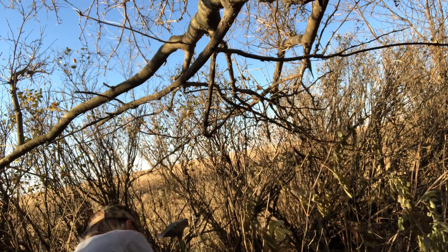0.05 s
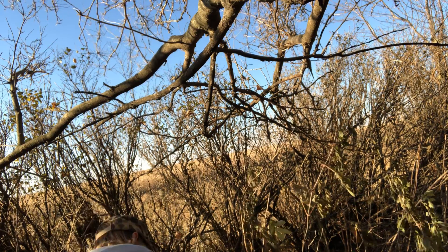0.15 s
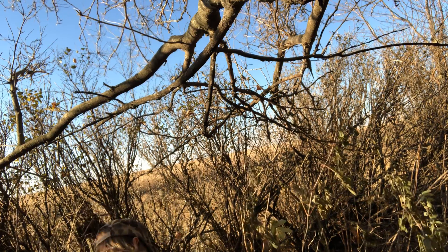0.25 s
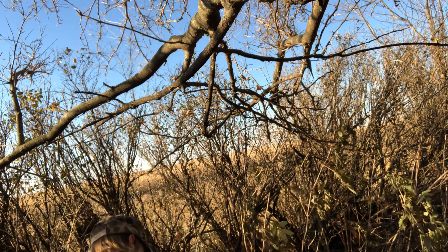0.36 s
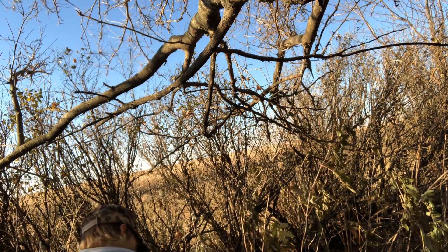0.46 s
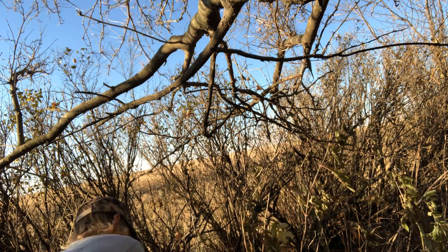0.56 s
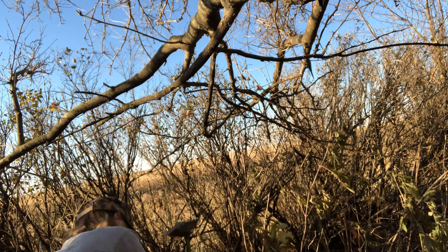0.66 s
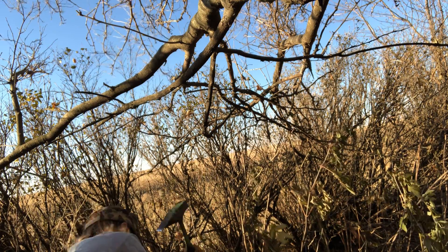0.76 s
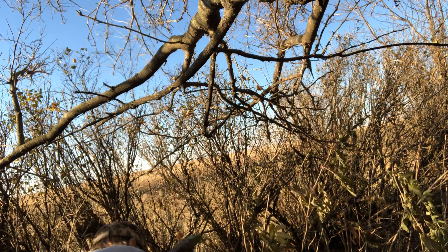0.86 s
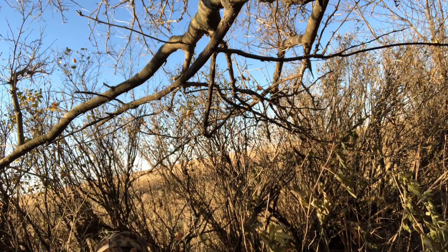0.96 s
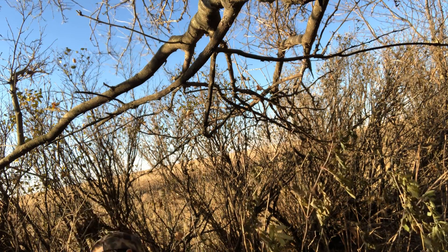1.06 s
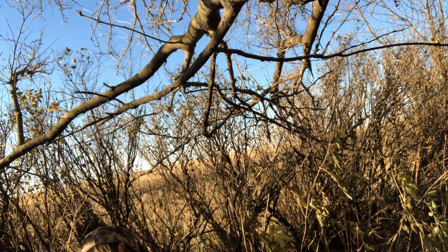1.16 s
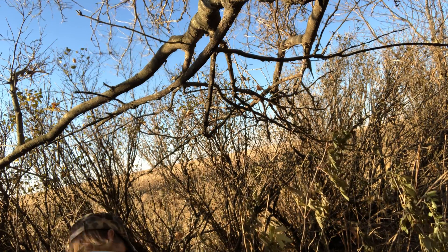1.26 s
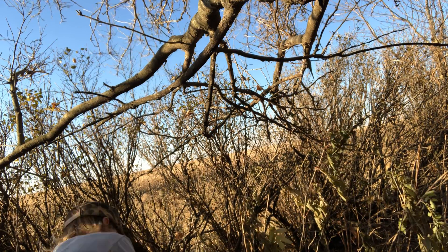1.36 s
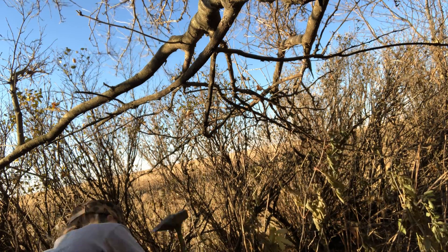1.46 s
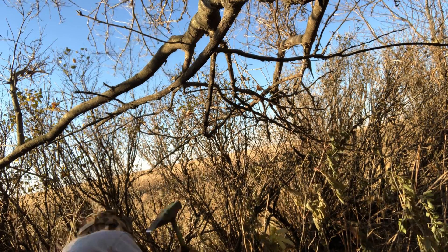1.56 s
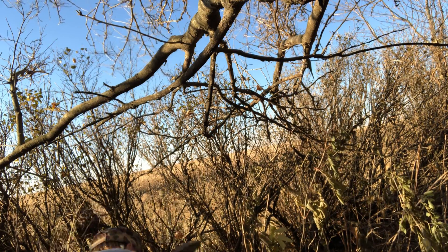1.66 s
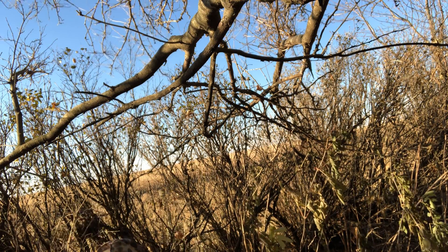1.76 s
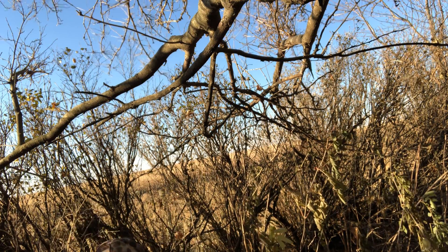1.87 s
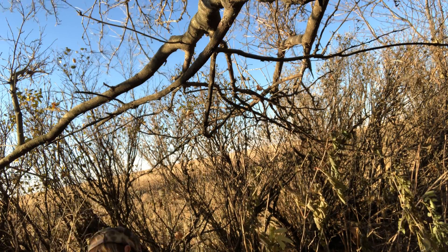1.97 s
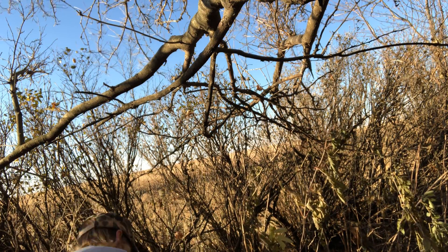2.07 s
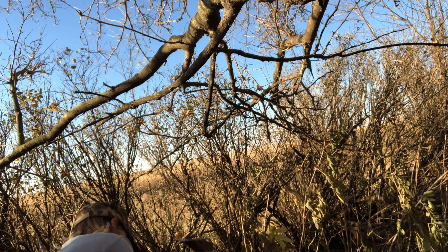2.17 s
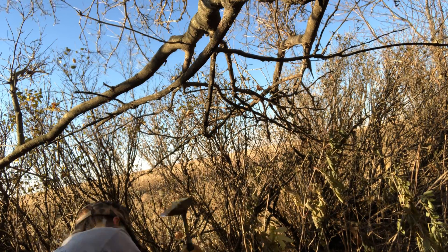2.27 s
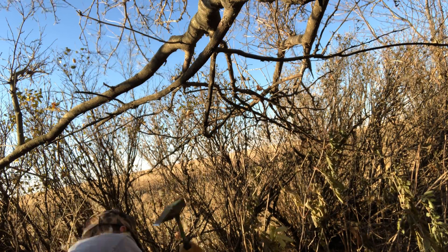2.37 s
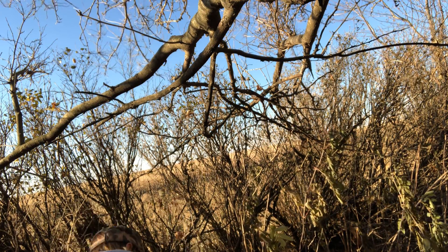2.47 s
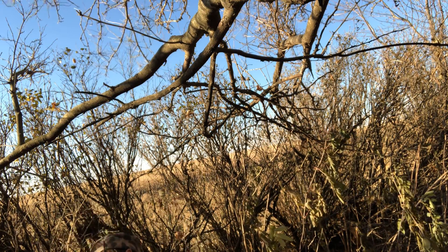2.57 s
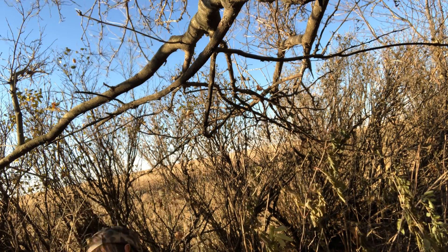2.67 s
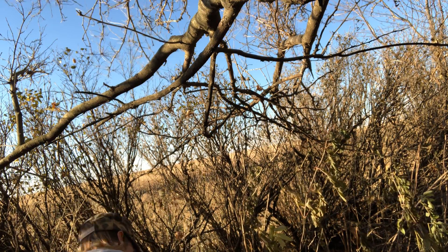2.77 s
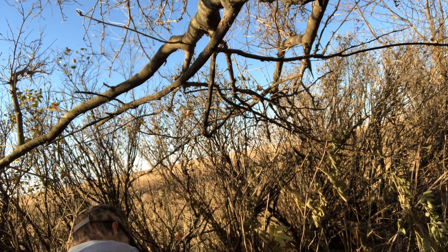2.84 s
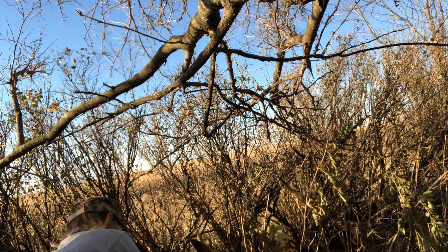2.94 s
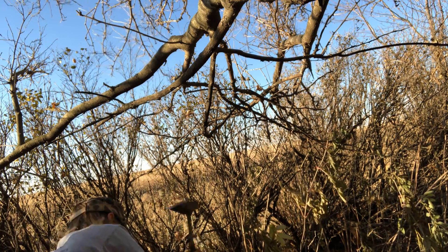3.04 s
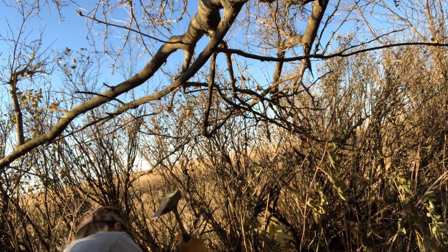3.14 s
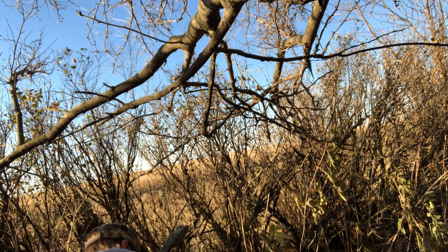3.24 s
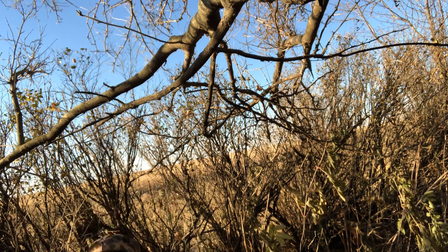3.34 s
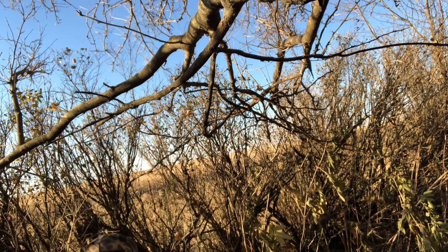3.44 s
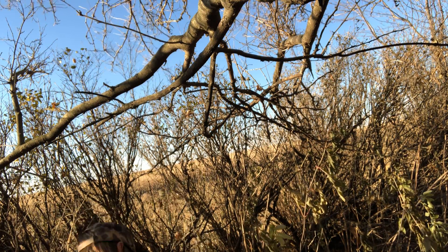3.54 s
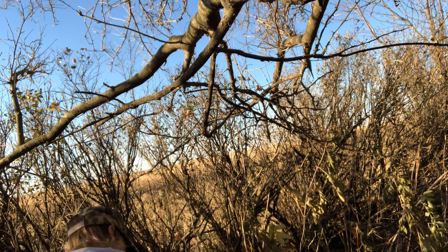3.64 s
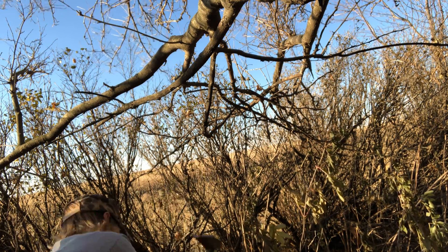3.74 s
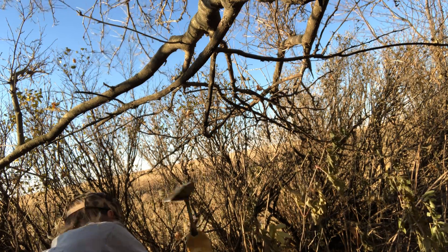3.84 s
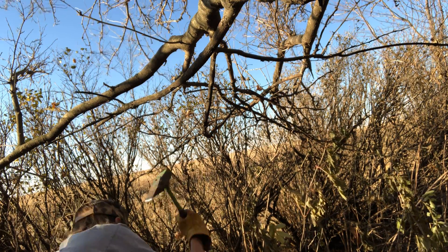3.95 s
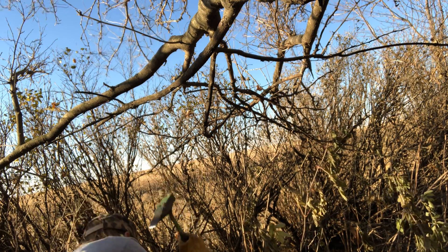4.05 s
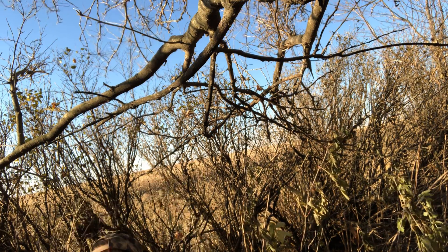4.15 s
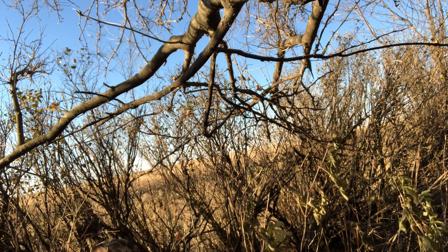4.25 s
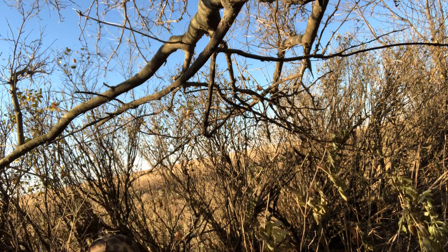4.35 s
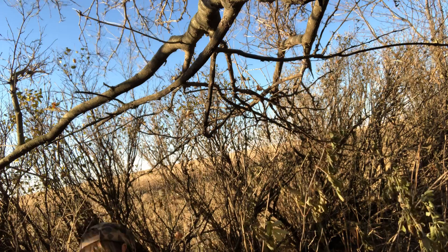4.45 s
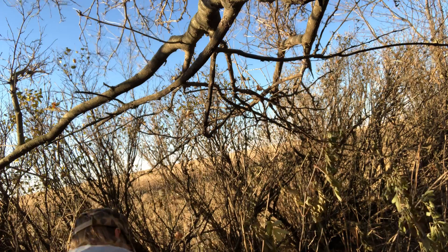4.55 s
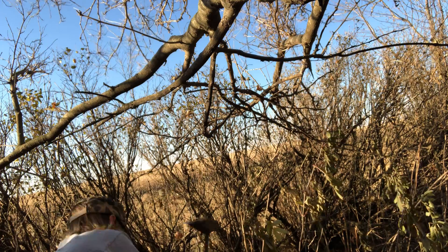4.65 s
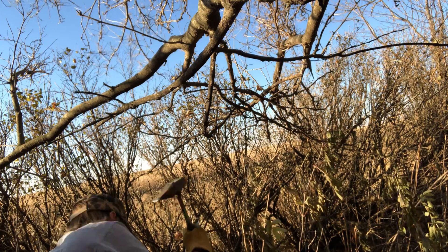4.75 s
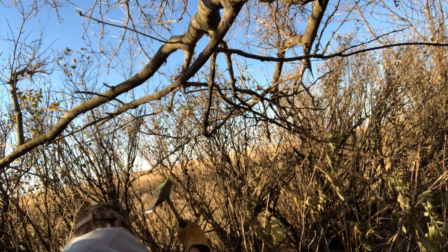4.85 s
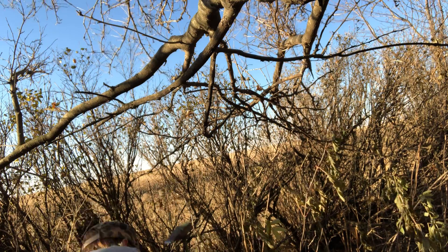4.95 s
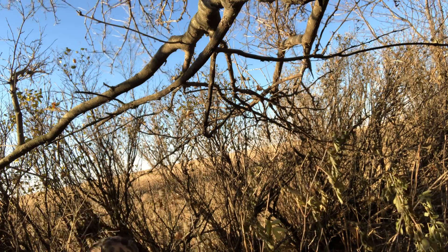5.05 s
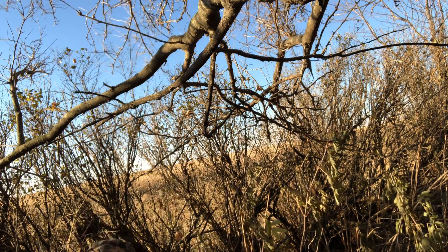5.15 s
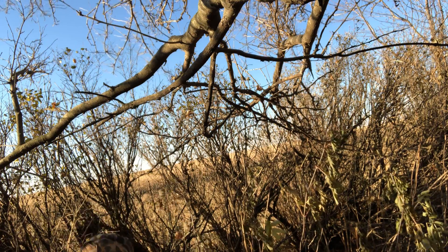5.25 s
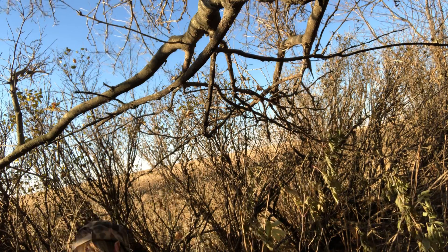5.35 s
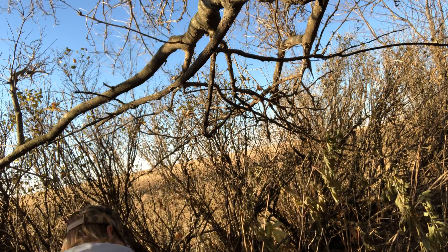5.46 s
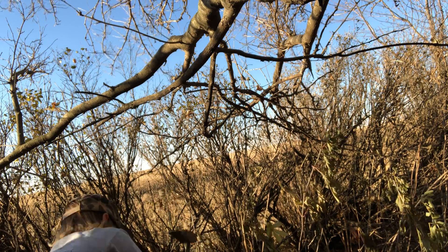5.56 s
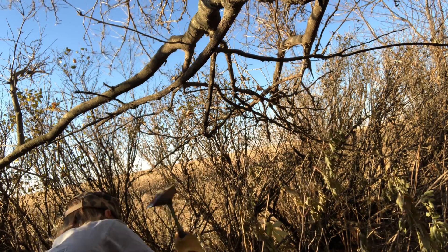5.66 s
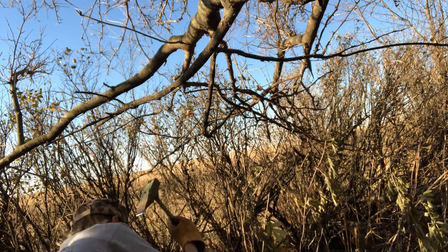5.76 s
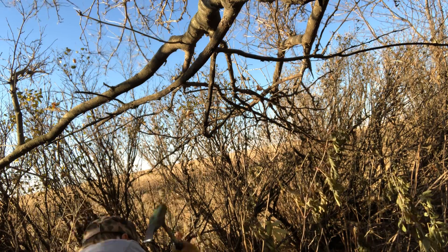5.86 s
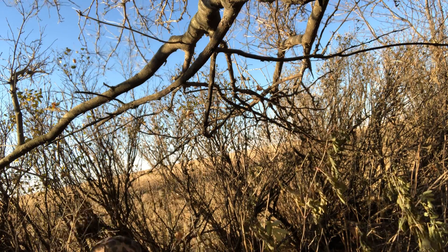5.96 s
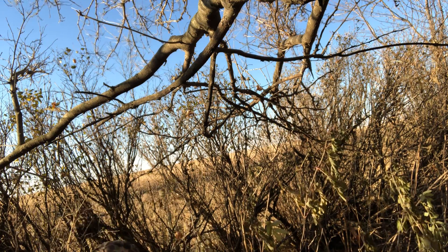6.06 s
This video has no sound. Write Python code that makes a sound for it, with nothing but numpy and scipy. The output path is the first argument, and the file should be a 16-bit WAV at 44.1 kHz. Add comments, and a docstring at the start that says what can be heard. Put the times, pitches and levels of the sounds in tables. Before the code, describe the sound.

After a faint sleeve rub, heavy steel-on-steel blows begin, dry and piercing, their ring quickly choked by soil. The first two are followed by bouncing clinks; cloth rubs and snaps before the third. Later blows sound fuller and knockier. A soft low bump comes before the final blow, then cloth again. Open brushy ground, nearly no echo, a single near microphone, quiet hum and leaf ticks behind.

```python
"""Brushy woods, one microphone behind the hammer: distant air hums and leaves tick throughout.
A sleeve rubs near the start, after the second blow and at the end. Eight hard blows drive a steel trap stake
into soft ground, among light touches and thin tings: each blow is a noise crack, damped sine modes of stake and
head, a falling soil thud and noise scattered in the brush. Late on the hum eases into a lull and a soft low bump
falls between the last two blows. The recorder's limiter ducks on peaks, rounds the rest and cuts the top."""
import sys
import numpy as np
from scipy import signal
from scipy.fft import rfft, irfft, next_fast_len
from scipy.io import wavfile
from scipy.ndimage import uniform_filter1d, minimum_filter1d, map_coordinates

SR = 44100
rng = np.random.default_rng(int(sys.argv[2]) if len(sys.argv) > 2 else 0)


def pcm_store(signal):
    """Save signal as 16-bit PCM."""
    levels = np.round(np.clip(np.atleast_2d(signal), -1, 1) * 32767)
    wavfile.write(sys.argv[1], SR, levels.astype(np.int16).T)


N = 269451  # length in samples
T = np.arange(SR // 2) / SR  # seconds since a contact

# All levels in the tables are relative; each layer sets its own place in the mix.
# Hard blows on the stake. Each row: start in seconds, force in dB, dull knock in dB, low stake ring in dB,
# high stake ring in dB, lingering ring in dB, hammer ring in dB, soil thud in dB,
# thud lag in seconds, thud attack in seconds.
HARD_BLOWS = [(0.2298, 0, -7.5, -3.5, -3, -27, 6.5, -2, 0, .009),
              (0.9635, 0, -2, -4, 0, -27, 7.5, 0, 0.00048, .01),
              (1.7603, 1, -1, -3, 1.5, -26, -17, 0, 0.0035, .008),
              (2.5325, 2.5, -8, -2, 2, -25, 0.5, 0.5, 0.0036, .009),
              (3.3440, 2.5, 4, 0.5, 0, -19, 2.5, 1, 0.0008, .01),
              (4.1830, 1.5, 7.5, 2.5, -0.5, -20, -1, 0, 0.0024, .011),
              (5.0672, 1, 1, 3, 1, -25, 6.5, -1.5, .002, .027), (6.0160, 4, 4, 2, 2, -25, 3, -5, .01, .02)]
# Colour of steel cracking on steel. Each row: frequency in Hz, level in dB.
CRACK_COLOUR = [(150, -31), (500, -28), (1100, 5), (1550, -12.5), (2100, 5.5), (3300, -4.5), (4000, 2.5),
                (4950, 2.5), (5700, -17.5), (6700, -1.5), (8300, -20.5), (13000, -13), (16000, -21)]
# Colour of the dull knock under the crack. Each row: frequency in Hz, level in dB.
KNOCK_COLOUR = [(200, -54), (430, -1), (620, -11.5), (830, -2), (1150, 5.5), (1520, -10.5), (3000, -21),
                (16000, -46)]


def blows():
    """Full swings: crack, its bounce off the ground, a second contact, ringing steel, thud and scatter."""
    out = np.zeros(N)
    for s, force_db, knock_db, low_db, high_db, linger_db, hammer_db, soil_db, lag, attack in HARD_BLOWS:
        crack = amp(force_db + 8.5) * burst(CRACK_COLOUR, fade_s=.015)
        knock = amp(knock_db - 3) * burst(KNOCK_COLOUR, fade_s=.023)
        add(out, s, crack + knock)
        ground_bounce = amp(force_db + .5) * burst(CRACK_COLOUR, fade_s=.022)
        add(out, s + .0034, ground_bounce)
        rebound_s = .013 + .005 * rng.random()  # the stake springs back against the hammer face
        add(out, s + rebound_s, amp(force_db - 18) * burst(CRACK_COLOUR, fade_s=.022))
        add(out, s, amp(-13) * stake_ring(low_db, high_db, linger_db))
        add(out, s, amp(hammer_db - 13.5) * hammer_ring())
        add(out, s, amp(force_db - 16.5) * brush(rise=.0011))
        add(out, s + lag, amp(soil_db) * thud(attack))
    return out


# Modes of the stake. Each row: frequency in Hz, level in dB, 60 dB decay in seconds before the soil's damping.
STAKE_MODES = [(1938, -4, .14), (2025, 0, .12), (2480, -15, .14), (2640, -13, .11), (2965, -11, .11),
               (3740, -1, .14), (4585, -7, .12), (4960, -6, .1), (5060, -2, .12), (6860, -13, .12),
               (7000, -6, .11), (7940, -18, .11), (9165, -15, .11), (10580, -14, .11), (11040, -17, .12),
               (11940, -13, .11), (12850, -20, .12), (13700, -19, .1)]


def stake_ring(low_db, high_db, linger_db):
    """The struck stake rings in its modes while the soil damps it."""
    soil_grip = amp(-60 * T / .52)
    return soil_grip * ring(STAKE_MODES, waver=.014, vary_db=3.5,
                            low_db=low_db, high_db=high_db, linger_db=linger_db)


# Modes of the hammer head. Each row: frequency in Hz, level in dB, 60 dB decay in seconds before the hand's damping.
HAMMER_MODES = [(5342, 0, .15), (11620, -32, .16)]


def hammer_ring():
    """The head rings once it has left the stake, and the hand damps it."""
    leaving = 1 - np.exp(-T / .012)
    hand_damping = amp(-60 * T / .2)
    return ring(HAMMER_MODES, waver=.002, linger_db=-36) * leaving * hand_damping


SOIL_START_HZ, SOIL_END_HZ, SOIL_GLIDE_S = 541, 49.4, .011  # the glide closes exponentially
SOIL_DB, SOIL_HOLD_S, SOIL_T60_S = -24, .026, .08


def thud(attack):
    """High pitches arrive first through soil, so the ground wave is a lumpy falling sweep."""
    glide = SOIL_END_HZ + (SOIL_START_HZ - SOIL_END_HZ) * np.exp(-T / SOIL_GLIDE_S)
    pitch = glide * np.exp(.058 * wobble(67, size=len(T)))
    lumps_db = 2.2 * wobble(162, size=len(T))
    level = amp(SOIL_DB + lumps_db) * swell(T, attack, SOIL_HOLD_S, SOIL_T60_S)
    return level * np.sin(2 * np.pi * np.cumsum(pitch) / SR)


# Colour of what stems and soil scatter. Each row: frequency in Hz, level in dB.
SCATTER_COLOUR = [(200, -0.5), (1100, 3), (1600, 0), (2100, 7.5), (2450, 3), (3400, 5.5), (3900, 5),
                  (5000, 2.5), (5800, -5.5), (6900, 3.5), (8300, -10.5), (11500, -13.5), (16000, -20)]
# How the near brush dies away. Each row: frequency in Hz, 60 dB decay in seconds.
BRUSH_DECAY = [(300, 0.1), (1000, 0.067), (2000, 0.11), (4500, 0.12), (8000, 0.12), (15000, 0.16)]


def brush(rise):
    """Stems and soil scatter sound that dies band by band, with a faint return from farther trees."""
    hz, t, bands = signal.stft(noise(SCATTER_COLOUR, len(T)), SR, nperseg=256)
    near = amp(-60 * t / along(BRUSH_DECAY, hz)[:, None])
    far = amp(-31 - 60 * t / 1.05)
    scattered = signal.istft(bands * (near + far), SR, nperseg=256)[1][:len(T)]
    return scattered * (1 - np.exp(-T / rise))


# Light touches of hammer on stake. Each row: start in seconds, clink in dB, dull clack in dB, hammer ring in dB.
LIGHT_TAPS = [(0.3098, -9, -18, -19), (0.3235, -41, -26, -60), (1.0816, -12.5, -28, -36),
              (1.87, -40, -38.5, -55), (2.511, -36, -37, -64), (2.637, -25, -40, -63),
              (2.7398, -19, -5.5, -32.5), (5.0465, -32, -30, -45), (5.1317, -25, -25, -36),
              (5.17, -25, -34, -57)]
# Modes of the lightly touched stake. Each row: frequency in Hz, level in dB, 60 dB decay in seconds.
CLINK_MODES = [(2740, -9.5, 0.026), (3780, -9.5, 0.043), (4040, -8, 0.036), (4580, 0, 0.049),
               (5030, -8, 0.032), (6900, -20, .04), (11500, -23, 0.039), (11700, -21.5, 0.053)]
# Colour of the dull clack. Each row: frequency in Hz, level in dB.
CLACK_COLOUR = [(150, -7), (500, -4.5), (1050, 8), (1750, 3), (2300, -3.5), (4200, 0), (7500, -26),
                (16000, -75)]


def taps():
    """The hammer drops back on the stake: a clink, and the head rings freely."""
    out = np.zeros(N)
    for s, clink_db, clack_db, hammer_db in LIGHT_TAPS:
        clink = amp(clink_db - 7.5) * ring(CLINK_MODES, waver=.015)
        add(out, s, clink + amp(hammer_db) * ring(HAMMER_MODES))
        clack = amp(clack_db - 6.5) * burst(CLACK_COLOUR, fade_s=.034)
        tick = amp(clink_db - 12.5) * burst(CRACK_COLOUR, fade_s=.011)
        add(out, s, clack + tick)
        add(out, s, (amp(clink_db - 27.5) + amp(clack_db - 34)) * brush(rise=.0046))
    return out


# Grazing touches of the hammer's rim. Each row: start in seconds, level in dB.
RIM_GRAZES = [(0.285, -53), (0.328, -48), (1.026, -39.5)]


def grazes():
    """The rim of the head brushes the stake and wakes only its top mode, a thin, high ting."""
    out = np.zeros(N)
    hz, _, t60 = HAMMER_MODES[-1]
    for s, db in RIM_GRAZES:
        ting = ring([(hz, 0, t60)]) * (1 - np.exp(-T / .001))
        add(out, s, amp(db) * ting)
    return out


def bump():
    """A soft low bump on the ground between swings, made like the thud."""
    out = np.zeros(N)
    add(out, 5.274, amp(-17) * thud(attack=.04))
    return out


# Sleeve rubs as the arm moves. Each row: start in seconds, time until it begins to die in seconds, level in dB.
SLEEVE_RUBS = [(0.068, 0.057, -51), (1.332, 0.22, -39), (1.575, 0.046, -44.5), (1.722, 0.16, -49.5),
               (1.9, .12, -61), (5.99, 0.098, -36.5)]
# Colour of sliding cloth. Each row: frequency in Hz, level in dB.
CLOTH_COLOUR = [(120, -6), (350, -3.5), (850, 2), (1600, -2.5), (3800, 0), (7500, -2.5), (9500, -9.5),
                (15500, -7)]
RUB_ATTACK_S, RUB_T60_S = .054, .27  # every rub swells and dies alike


def jacket():
    """Cloth slides with a grainy hiss as the arm moves."""
    t = np.arange(N) / SR
    rubs = [amp(db) * swell(t - s, RUB_ATTACK_S, length, RUB_T60_S) for s, length, db in SLEEVE_RUBS]
    level = np.max(rubs, axis=0)  # the strongest rub wins
    grain = amp(1.2 * wobble(700) + .38 * wobble(50))
    return level * unit(noise(CLOTH_COLOUR, N) * grain)


# Folds and dry stalks snapping. Each row: start in seconds, level in dB.
FOLD_SNAPS = [(0.088, -47), (1.5325, -30), (1.7008, -43), (5.439, -49)]


def snaps():
    """Folds and stalks snap, each a short burst in the colour of cloth."""
    out = np.zeros(N)
    for s, db in FOLD_SNAPS:
        add(out, s, amp(db) * burst(CLOTH_COLOUR, fade_s=.039))
    return out


def litter(count=36):
    """Dry leaves tick faintly underfoot at chance moments, most of them near the softest level."""
    out = np.zeros(N)
    for place, size in rng.random((count, 2)):
        add(out, place * N / SR, amp(-62 + 10 * size ** 2) * burst(CLOTH_COLOUR, fade_s=.02))
    return out


# Colour of the distant open air. Each row: frequency in Hz, level in dB.
AIR_COLOUR = [(12, -49), (20, -18), (46, -13), (65, 1.5), (104, -2), (137, -3), (284, -3.5), (408, -3.5),
              (443, -4.5), (655, -10), (1350, -8.5), (1950, -10.5), (5470, -16.5), (14500, -36.5),
              (15800, -34)]
AIR_DB, LULL_DB, LULL_START_S, LULL_FADE_S = -50, -2, 4.9, .6


def air():
    """Distant open-air hum, coloured noise, slightly unsteady, that eases into a lull."""
    lull = np.clip((np.arange(N) / SR - LULL_START_S) / LULL_FADE_S, 0, 1)
    return amp(AIR_DB + LULL_DB * lull + .33 * wobble(6.8)) * noise(AIR_COLOUR, N)


def ring(modes, waver=0, vary_db=1, low_db=0, high_db=0, linger_db=-120):
    """Damped modes: the strike point weighs low against high, shifting contact blurs their pitch."""
    out = np.zeros(len(T))
    blur = waver * np.exp(-T / .11)  # the steel settles and the pitch clears
    for hz, db, t60 in modes:
        strike_db = along([(2100, low_db), (3600, high_db)], hz)
        level_db = db + vary_db * rng.standard_normal() + strike_db
        pitch = hz * (1 + blur * wobble(244, size=len(T)))
        cycles = np.cumsum(pitch) / SR + rng.random()
        # friction eats the big motion, a thin ring lingers
        fade = amp(-60 * T / t60) + amp(linger_db - 24 * T / t60)
        out += amp(level_db) * fade * np.sin(2 * np.pi * cycles)
    return out


def burst(spectrum, fade_s, size=2048):
    """A short contact noise: the colour is set, the phases are chance, and there is no bass."""
    fade = amp(-60 * T[:size] / fade_s)
    phase = np.angle(rfft(rng.standard_normal(size) * fade))
    colour = amp(along(spectrum, np.fft.rfftfreq(size, 1 / SR)))
    x = irfft(colour * np.exp(1j * phase)) * np.sqrt(fade)
    # small contacts radiate no bass
    x = signal.sosfilt(signal.butter(2, 376, 'high', fs=SR, output='sos'), x)
    return x * np.linalg.norm(fade) / np.linalg.norm(x)  # the energy of the plain fade


def noise(spectrum, size):
    """Coloured noise of rms 1."""
    m = next_fast_len(size)
    colour = amp(along(spectrum, np.fft.rfftfreq(m, 1 / SR)))
    return unit(irfft(rfft(rng.standard_normal(m)) * colour, m)[:size])


def wobble(rate, size=N):
    """A smooth random curve, rate knots a second."""
    knots = rng.standard_normal(int(size * rate / SR) + 4)
    return map_coordinates(knots, [np.arange(size) * rate / SR])


def swell(t, attack, hold, t60):
    """An envelope that rises over the attack and dies away from the hold time on."""
    return np.clip(t / attack, 0, 1) * amp(-60 * np.maximum(t - hold, 0) / t60)


def amp(db):
    """Decibels to gain."""
    return 10 ** (np.asarray(db) / 20)


def unit(x):
    """Scale to rms 1."""
    return x / np.sqrt(np.mean(x ** 2) + 1e-20)


def along(points, hz):
    """(Hz, value) points read on a log frequency axis."""
    f, v = np.transpose(points)
    return np.interp(np.log(hz + 1), np.log(f + 1), v)


def add(track, s, sound):
    """Mix a sound into the track at a time in seconds."""
    part = track[round(s * SR):][:len(sound)]
    part += sound[:len(part)]


def scene():
    """Everything heard from one spot behind the hammer, on one channel."""
    return (blows() + taps() + grazes() + bump() + jacket() + snaps() + litter() + air())[None]


def limiter(x, ceiling_db, hold, release):
    """The gain dips around a peak over the ceiling, holds, then climbs back; times in seconds."""
    need_db = np.minimum(0, ceiling_db - 20 * np.log10(np.abs(x) + 1e-9))
    held_size, release_size = max(3, int(hold * SR)), max(3, int(release * SR))
    # the origins make both windows look back in time
    held = minimum_filter1d(need_db, held_size, origin=(held_size - 1) // 2)
    slow = uniform_filter1d(held, release_size, origin=(release_size - 1) // 2)
    early = minimum_filter1d(np.minimum(held, slow), size=45)  # starts just ahead of the peak
    gain_db = uniform_filter1d(early, size=45)
    return x * amp(gain_db)


def record(dry):
    """The recorder limits loud peaks, rounds what still overshoots and cuts the top of the band."""
    limited = limiter(dry, ceiling_db=.5, hold=.0044, release=.0095)
    rounded = limited / (1 + (limited / .92) ** 6) ** (1 / 6)
    m = next_fast_len(N + SR // 2)
    passed = np.fft.rfftfreq(m, 1 / SR) < 16000  # Hz
    return irfft(rfft(rounded, m) * passed, m)[:, :N]


dry = scene()
out = record(dry)
pcm_store(out)
```